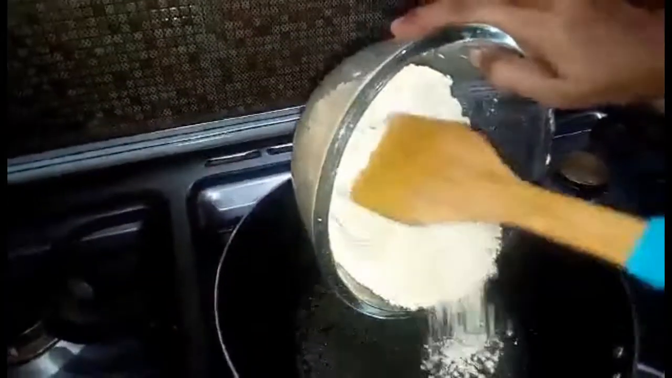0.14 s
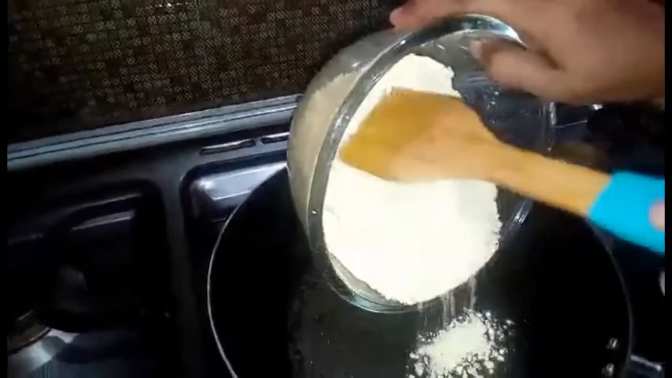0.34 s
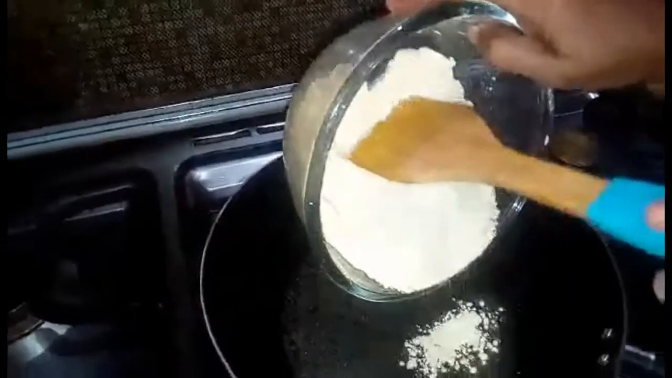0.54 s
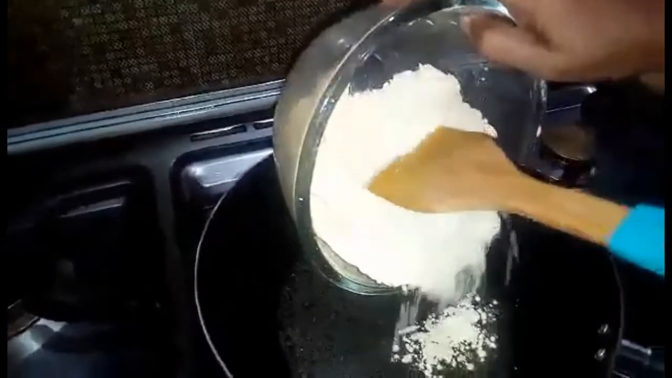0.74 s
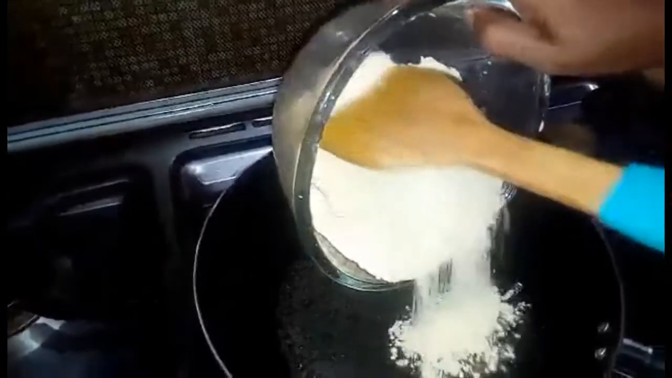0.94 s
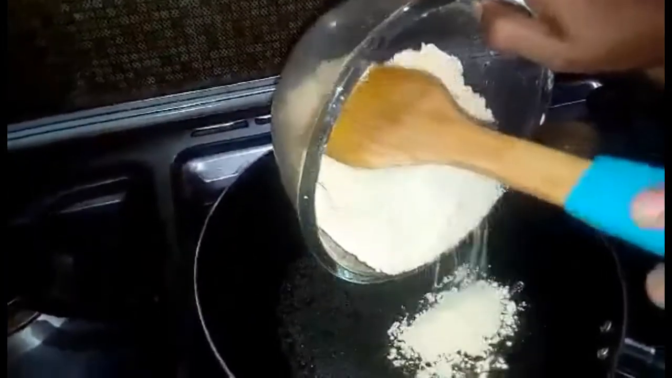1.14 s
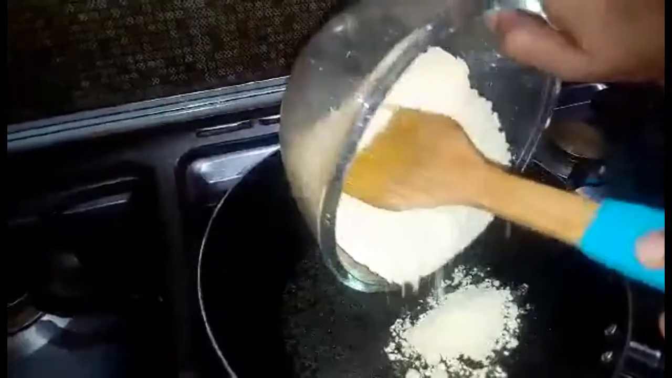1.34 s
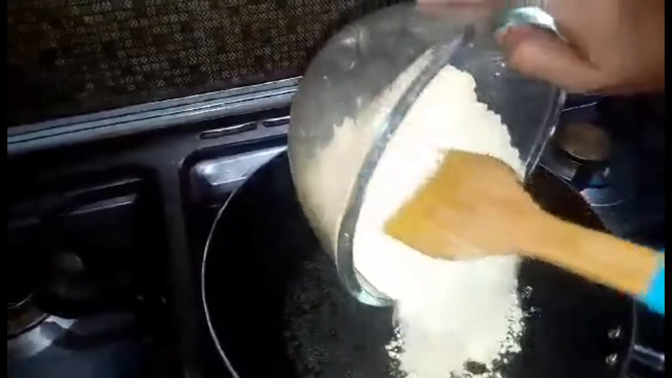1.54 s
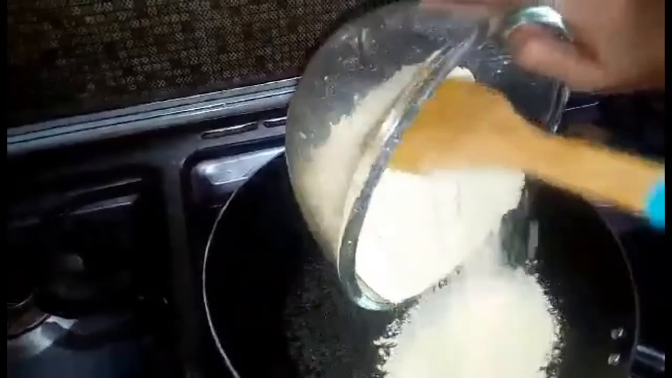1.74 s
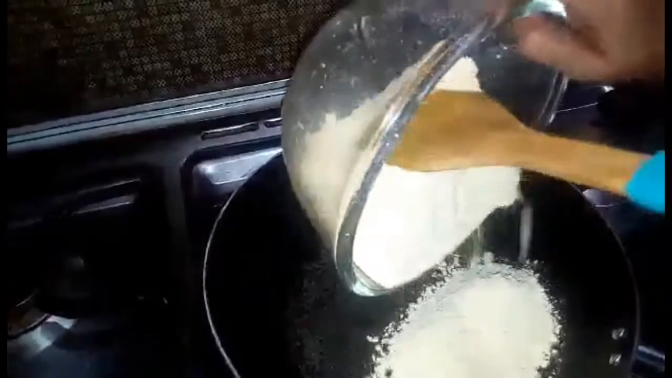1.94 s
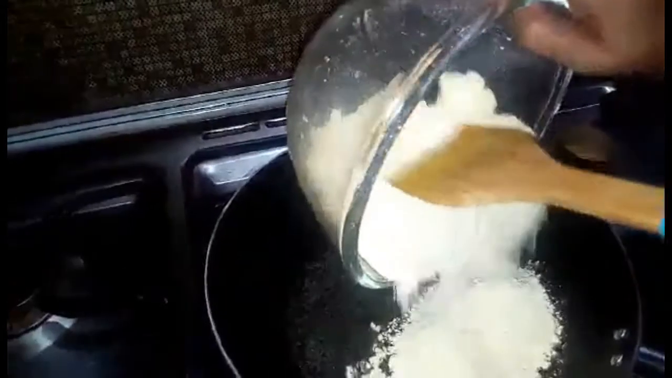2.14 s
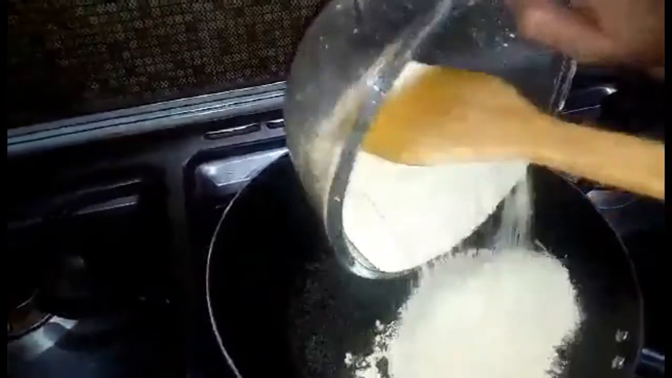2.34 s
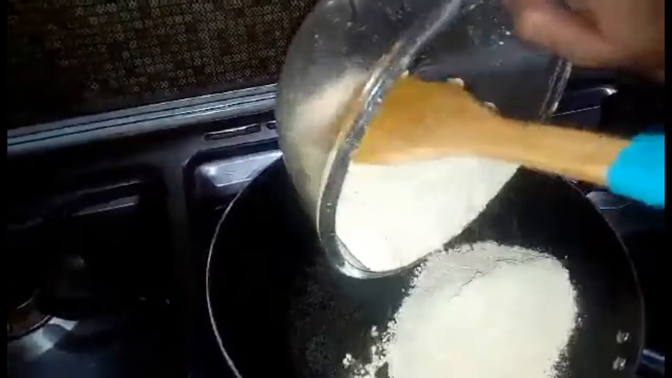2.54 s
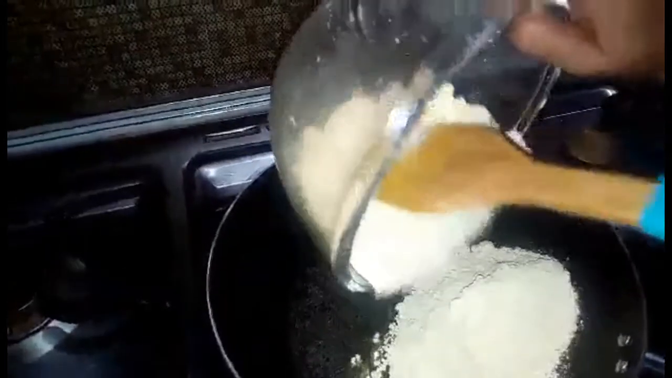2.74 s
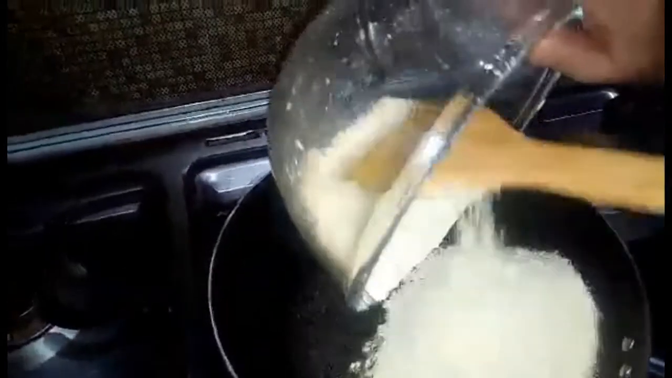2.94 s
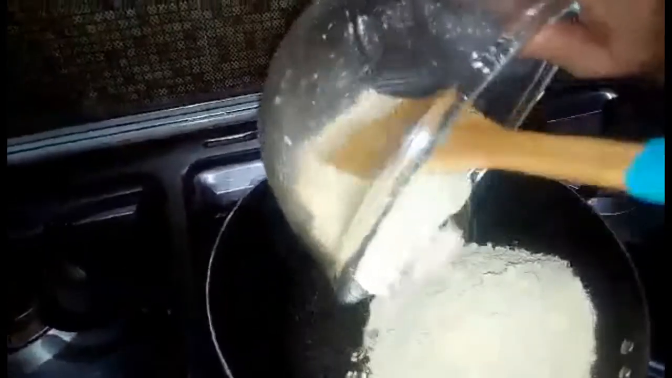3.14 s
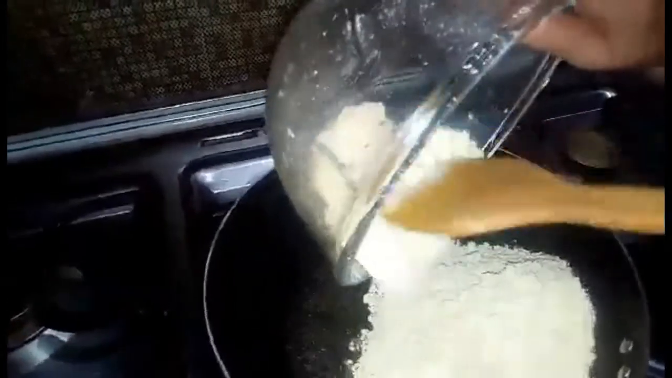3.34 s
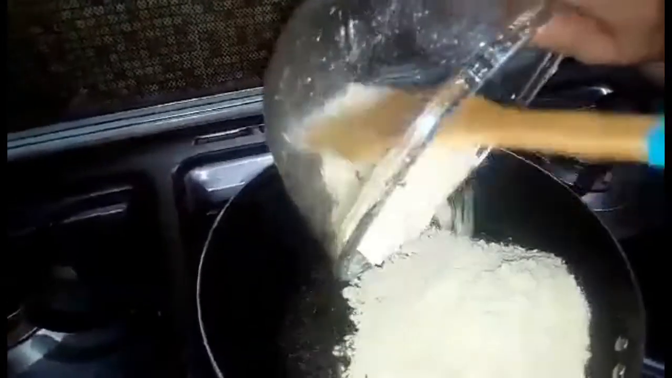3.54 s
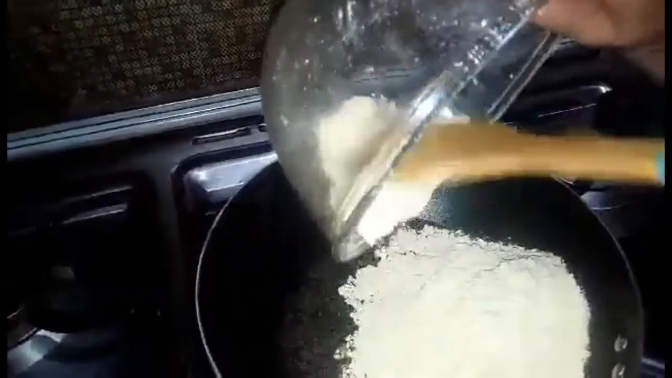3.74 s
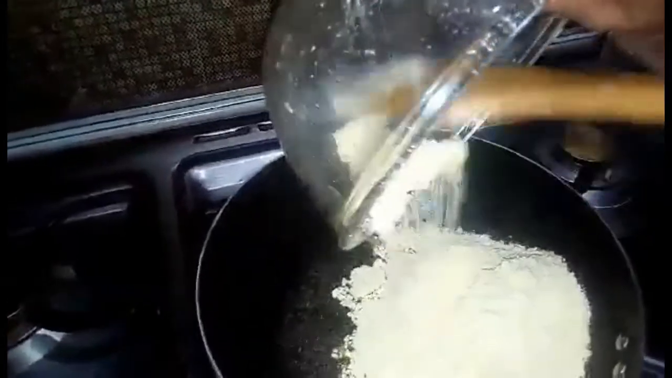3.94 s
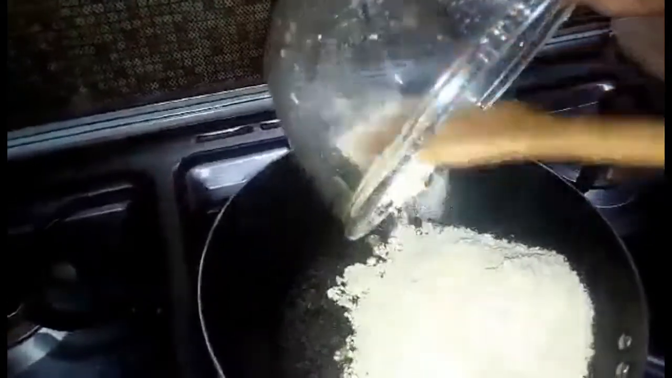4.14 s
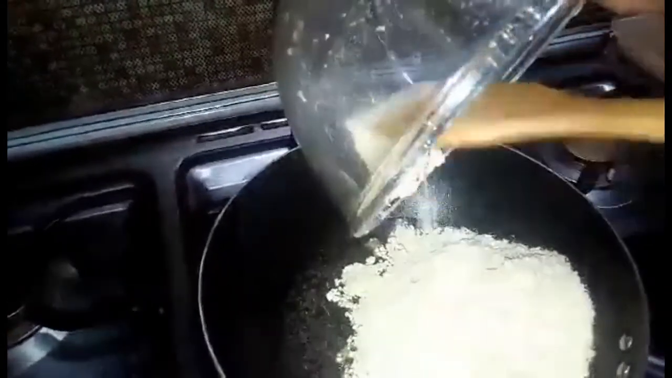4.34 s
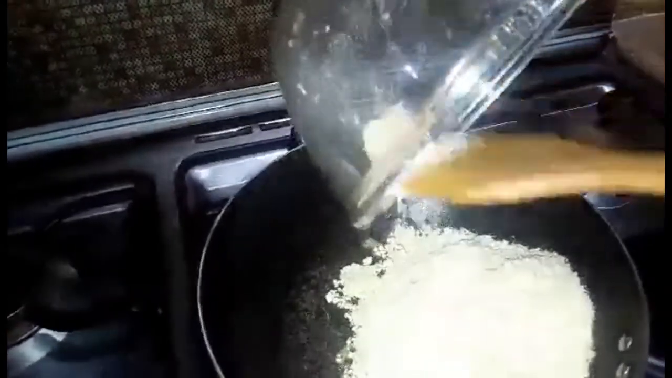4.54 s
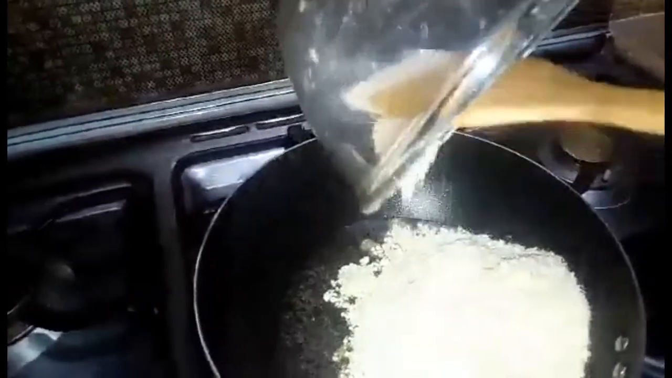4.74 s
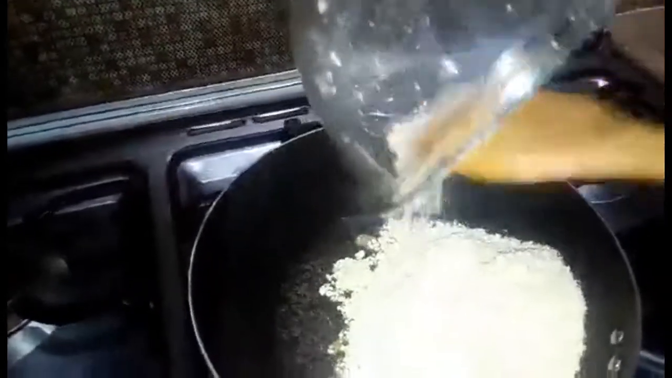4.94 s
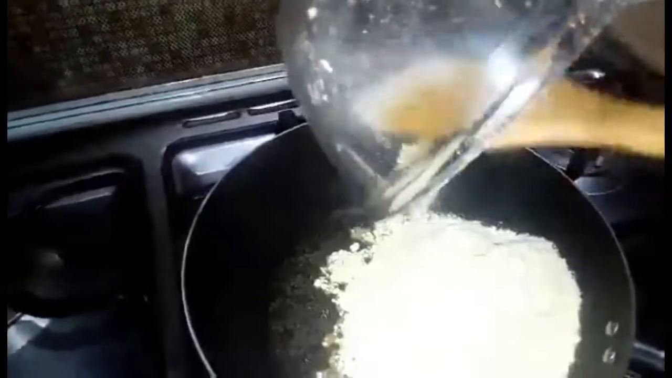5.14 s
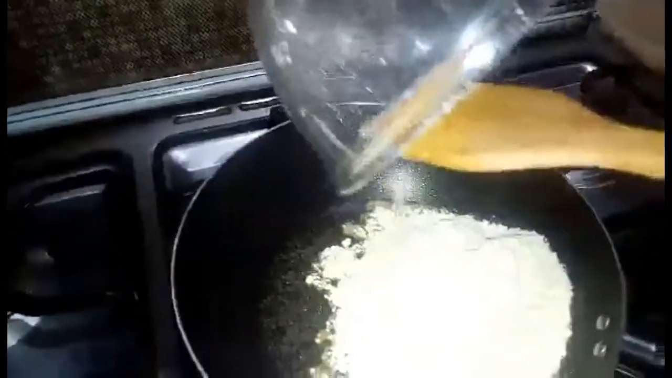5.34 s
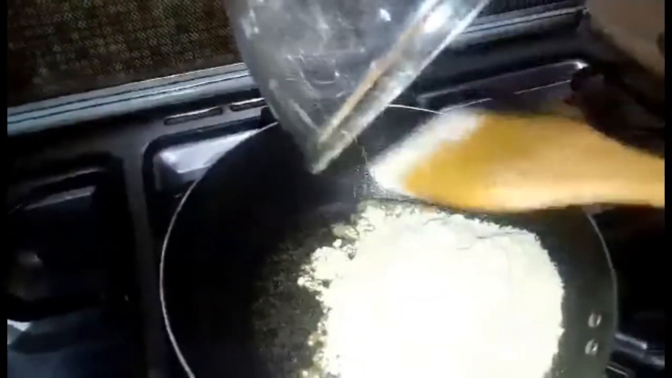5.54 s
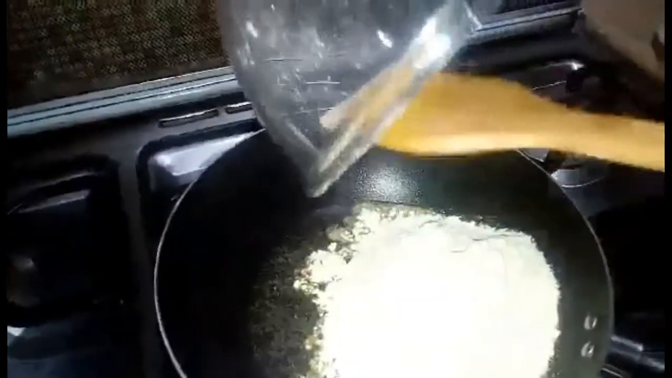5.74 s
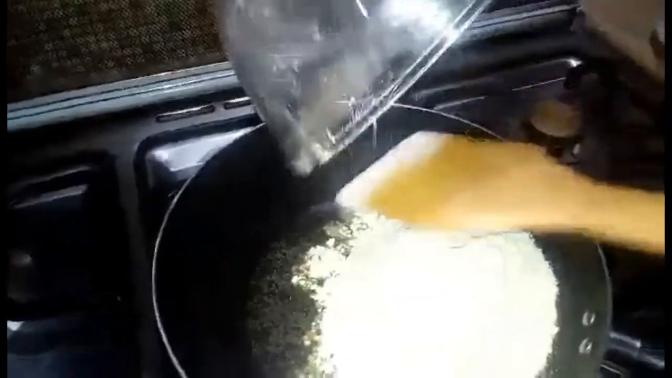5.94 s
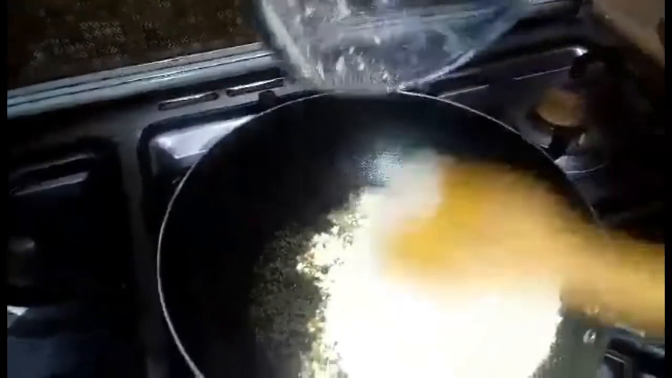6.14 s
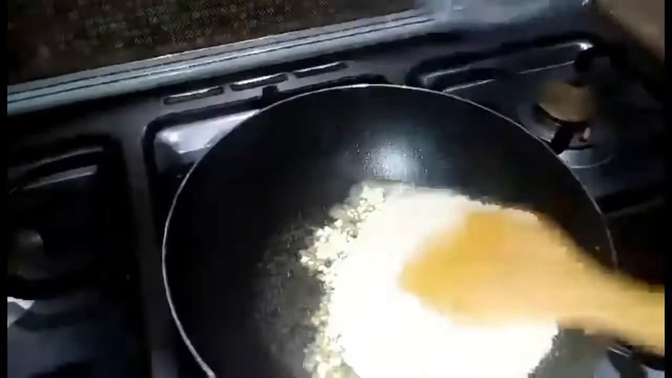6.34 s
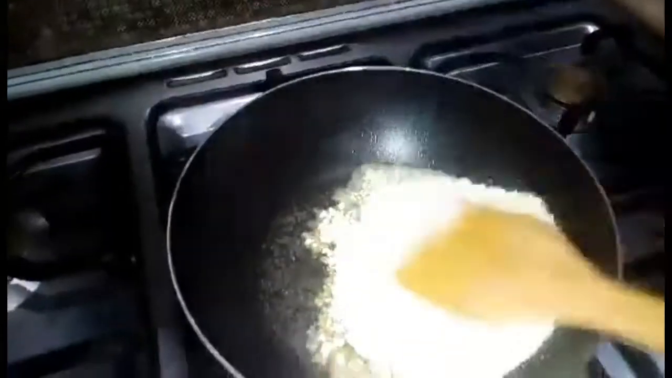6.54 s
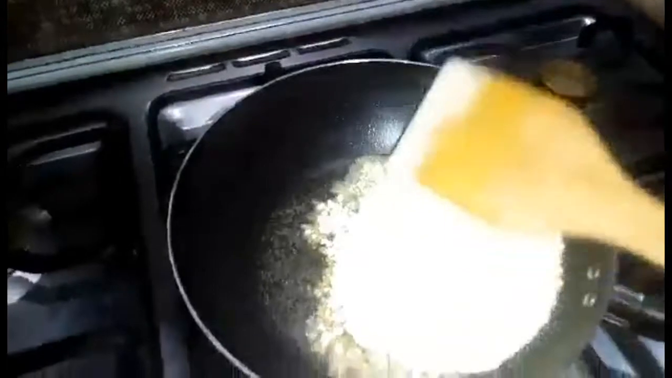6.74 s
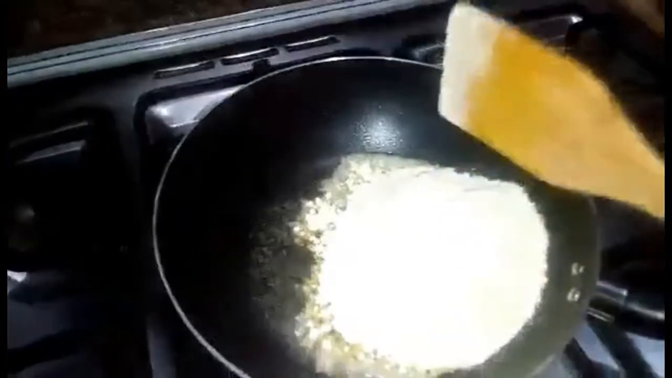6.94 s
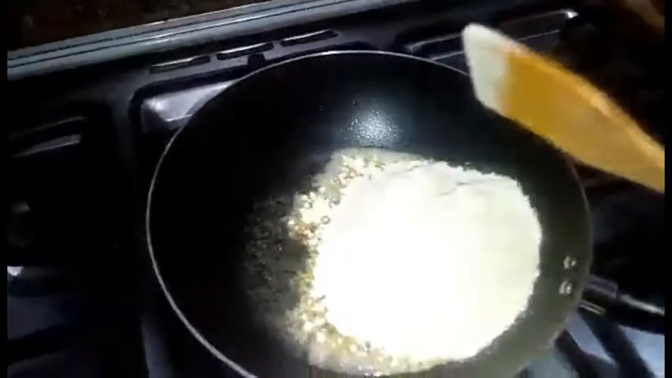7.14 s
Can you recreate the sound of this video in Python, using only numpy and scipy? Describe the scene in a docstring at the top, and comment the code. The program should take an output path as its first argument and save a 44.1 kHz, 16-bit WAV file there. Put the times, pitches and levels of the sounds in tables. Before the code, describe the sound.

Close to the microphone in a small kitchen, a wooden spatula pushes flour from a glass bowl. After a quiet second of gas hiss and motor hum come sparse knocks, some hard, some muffled by flour, with grainy swishes between. Later knocks are brighter and more glassy, each with a faint ring and short room tail. The last hard clack comes near six seconds, then only burner, hum and tiny pan ticks remain.

```python
"""A gas burner hisses and a motor hums, as filtered noise and drifting sine tones; a hot pan ticks faintly.
A wooden spatula pushes flour out of a hand-held glass bowl into the pan, close to the microphone.
Between knocks it swishes: noise in a narrow, grainy band. Each knock is a short blow sent through resonances:
dull while flour cushions the blade, bright once the glass is bare.
The glass rings faintly after each knock, and the small kitchen answers with a short tail of noise."""
import sys
import numpy as np
from scipy import signal
from scipy.fft import rfft, irfft, next_fast_len
from scipy.io import wavfile
from scipy.ndimage import uniform_filter1d, minimum_filter1d, map_coordinates

SR = 44100
rng = np.random.default_rng(int(sys.argv[2]) if len(sys.argv) > 2 else 0)


def persist_wave(psi):
    """Save psi, clipped to +-1, as 16-bit WAV."""
    counts = np.round(np.clip(psi, -1, 1) * 32767).astype(np.int16)
    wavfile.write(sys.argv[1], SR, np.atleast_2d(counts).T)


N = 321048


def amp(db):
    """Turn decibels into a gain."""
    return 10 ** (np.asarray(db) / 20)


def unit(x):
    """Scale a sound to rms 1."""
    return x / np.sqrt(np.mean(x ** 2) + 1e-20)


def along(points, hz):
    """Read a curve of (f/Hz, value) points, with frequency on a log axis."""
    f, value = np.transpose(points)
    return np.interp(np.log(hz + 1), np.log(f + 1), value)


def wobble(rate):
    """A smooth random curve through `rate` random points a second."""
    points = rng.standard_normal(int(N * rate / SR) + 4)
    return map_coordinates(points, [np.arange(N) * rate / SR])


def filtered(x, response):
    """Shape a sound by a response that depends on frequency."""
    size = next_fast_len(len(x) + SR // 4)
    hz = np.fft.rfftfreq(size, 1 / SR)
    return irfft(rfft(x, size) * response(hz), size)[:len(x)]


def noise(spectrum):
    """Random noise coloured by a spectrum, at rms 1."""
    return unit(filtered(rng.standard_normal(N), lambda hz: amp(along(spectrum, hz))))


def causal(gain):
    """The minimum-phase response with this gain: it acts as early as it can."""
    cepstrum = irfft(np.log(gain))
    half = len(cepstrum) // 2
    return np.exp(rfft(np.r_[cepstrum[0], 2 * cepstrum[1:half], np.zeros(half)]))


def add(track, start_s, sound):
    """Mix a sound into the track from start_s on."""
    part = track[max(round(start_s * SR), 0):][:len(sound)]
    part += sound[:len(part)]


# How loud the background is over time, before trims: t/s, burner level/dB, room noise level/dB
STEADY_LEVELS = [(0.0, -46.5, -54), (1.52, -48, -54), (2.66, -49, -54), (2.9, -48, -55), (3.26, -44.5, -54),
                 (3.55, -45, -53), (4.24, -52.5, -56.5), (4.85, -50, -57.5), (5.09, -46.5, -56),
                 (5.52, -49, -56), (5.88, -47.5, -55), (6.1, -49, -58.5), (6.93, -48.5, -57),
                 (7.28, -52, -56.5)]
BURNER_TRIM_DB, ROOM_TRIM_DB = -0.75, 0.08


def steady_levels():
    """The burner and room levels glide in straight lines (in dB) between the table's points."""
    times, *columns = np.transpose(STEADY_LEVELS)
    return [np.interp(np.arange(N) / SR, times, column) for column in columns]


# Colour of the room noise: f/Hz, relative level/dB (per Hz)
ROOM_COLOUR = [(20, -23), (45, -9.5), (75, -5.5), (125, 2), (175, -3.5), (280, 3), (340, -2), (600, -1),
               (1200, -6.5), (1400, -5.5), (1560, 1), (1800, -4.5), (3000, -10.5), (6000, -30)]
# Tones of the motor, before they swell with the room: f/Hz, rms level/dB
HUM_TONES = [(101, -55), (206, -69), (287, -71), (308, -72.5), (400, -72)]


def hum_tone(hz, drift_hz=1.32):
    """One motor tone whose pitch and level both waver slightly, at rms about 1."""
    level = amp(.6 * wobble(9))
    turns = np.cumsum(hz + drift_hz * wobble(9)) / SR
    return level * np.sqrt(2) * np.sin(2 * np.pi * turns)


def room_and_motor(room_db):
    """Soft room noise with a motor humming in it."""
    hum = sum(amp(db) * hum_tone(hz) for hz, db in HUM_TONES)
    # the hum swells and sinks with the rest of the room noise
    swell = amp(room_db - room_db.mean())
    return amp(room_db + ROOM_TRIM_DB) * noise(ROOM_COLOUR) + swell * hum


# Resonant band of the burner's throat: f/Hz, relative level/dB (per Hz)
BURNER_COLOUR = [(1200, -66), (1900, -14.5), (2100, -2), (2220, 9.5), (2370, 5), (2480, 3), (2680, -5.5),
                 (2900, -31), (4000, -52)]
# Higher, steadier hiss of the burner: f/Hz, relative level/dB (per Hz)
HISS_COLOUR = [(1500, -29), (3000, -10), (3800, -6.5), (4200, -3), (4750, -1), (5050, 6), (5300, 0.5),
               (6300, -2), (7100, -9.5), (8500, -15.5), (10500, -14.5), (13000, -15)]


def gas_burner(burner_db, hiss_db=-60.0):
    """Gas rushes through the burner's resonant throat; both noise bands flutter at random."""
    throat = amp(burner_db + BURNER_TRIM_DB + 1.7 * wobble(7.22)) * noise(BURNER_COLOUR)
    hiss = amp(hiss_db + 1.5 * wobble(19.0)) * noise(HISS_COLOUR)
    return throat + hiss


def background():
    """The burner and the humming room together."""
    burner_db, room_db = steady_levels()
    return gas_burner(burner_db) + room_and_motor(room_db)


# The clearest tiny bursts in the hot pan: t/s, starting level/dB before colouring
CLEAR_TICKS = [(2.304, -46), (4.933, -48), (5.402, -43), (5.428, -43), (6.573, -44), (6.624, -47),
               (7.0, -42)]
# Colour of every tick: f/Hz, gain level/dB
TICK_TONE = [(2000, -20), (5000, 4), (8000, -3.5), (11500, -1.5), (14000, -7)]


def pan_ticks(t60=0.011, faint_db=-60, spread_db=6, count=32):
    """A few clear ticks among many faint ones, which come ever faster as the pan fills; each is fading noise."""
    out, t = np.zeros(N), np.arange(SR // 20) / SR
    # the square root crowds the faint ticks towards the end
    faint = [(np.sqrt(when) * N / SR, faint_db + spread_db * size) for when, size in rng.random((count, 2))]
    for start_s, db in CLEAR_TICKS + faint:
        fade = amp(db - 60 * t / t60)
        add(out, start_s, fade * rng.standard_normal(len(t)))
    return filtered(out, lambda hz: amp(along(TICK_TONE, hz)))


# Blade sliding through flour on glass, before the grain:
# middle t/s, half length t/s (to 1/e of the peak), peak level/dB, centre f/Hz
SLIDES = [(0.778, 0.061, -61, 5000), (1.216, 0.078, -61, 6140), (1.89, 0.061, -52.5, 5830),
          (2.547, 0.051, -51.5, 4500), (2.583, .06, -52, 6100), (3.116, 0.046, -52.5, 6000),
          (3.311, 0.056, -53.5, 5700), (3.513, 0.76, -65, 4200), (4.34, 0.036, -58.5, 5700),
          (4.639, 0.38, -63, 5400), (6.313, 0.036, -61, 4200)]


def swishes(width=0.097, grain_db=2.3):
    """Powder shears under the blade in a narrow, grainy hiss that swells and fades; width is a share of centre."""
    out, t = np.zeros(N), np.arange(N) / SR
    for middle_s, half_s, db, centre_hz in SLIDES:
        stroke = t[abs(t - middle_s) < .4]
        band = lambda hz: 1 / (1 + ((hz / centre_hz - 1) / width) ** 2)
        rub = unit(filtered(rng.standard_normal(SR), band))[:len(stroke)]
        swell = np.exp(-((stroke - middle_s) / half_s) ** 2)
        add(out, stroke[0], amp(db) * rub * swell)
    return out * amp(grain_db * wobble(140))


# How long the kitchen rings: f/Hz, time to fall by 60 dB t/s
KITCHEN_DECAY = [(200, 0.26), (600, 0.32), (1400, 0.44), (3500, 0.39), (6000, 0.47), (11000, 0.27)]
# How strongly the walls reflect, before the overall room level: f/Hz, level/dB
WALL_COLOUR = [(150, 15.5), (400, 6), (650, 8.5), (1200, -7.5), (2400, -1), (3200, -4.5), (5500, -1.5),
               (10000, -5.5)]


def kitchen(x, build_up_s=0.0012):
    """The diffuse answer of the room: a noise tail in which each frequency dies at its own speed."""
    hz, t, cells = signal.stft(rng.standard_normal(SR // 2), SR, nperseg=256)
    fade = amp(-60 * t / along(KITCHEN_DECAY, hz)[:, None])
    tail = signal.istft(cells * fade, SR, nperseg=256)[1]
    tail = tail * (1 - np.exp(-(np.arange(len(tail)) / SR / build_up_s) ** 2))
    tail = filtered(tail / np.linalg.norm(tail), lambda f: amp(along(WALL_COLOUR, f)))
    return signal.fftconvolve(x, tail)[:len(x)]


CUSHION_HZ = 1296  # flour moves the blow's energy from above this to below it
PUSH_HZ, PUSH_CONTACT_S = 466, 0.00024  # the push on the whole bowl lies below this; neutral contact time
PUSH_DB, FLOUR_PUSH = 7, 0.14  # push in dB per doubling of the contact time, and per dB of cushion


def blow_spectrum(hz, strength_db, contact_s, fall, cushion_db, crisp_db=-66):
    """A longer contact loses treble and pushes harder; flour under the blade turns a clack into a thud."""
    below = lambda corner: 1 / (1 + (hz / corner) ** 4)
    softness = 1 / np.hypot(1, amp(fall * np.log2(hz * contact_s + 1e-9)))
    tilt_db = cushion_db * (below(CUSHION_HZ) - .5)
    push_db = PUSH_DB * np.log2(contact_s / PUSH_CONTACT_S) + FLOUR_PUSH * cushion_db
    # a small crisp part keeps some treble in every blow
    return amp(strength_db + tilt_db + push_db * below(PUSH_HZ)) * (softness + amp(crisp_db))


OVERTONE, OVERTONE_DB = 2.38, -4  # second bending mode of the pressed blade, over its first


def contact_gain(hz, contact_hz, contact_db, width_hz=40.5):
    """The blade pressed on the glass has two bending modes of its own, different at each spot."""
    peak = lambda centre, db: amp(db) ** 2 / (1 + ((hz - centre) / width_hz) ** 2)
    first = peak(contact_hz, contact_db)
    second = peak(OVERTONE * contact_hz, contact_db + OVERTONE_DB)
    return np.sqrt(1 + first + second)


# Quickly damped resonances of blade and held bowl: f/Hz, width f/Hz, relative level/dB
BODY_MODES = [(342, 111, -15), (591, 77, 1), (874, 84, 2.5), (1176, 133, -2), (1539, 123, 1),
              (1910, 213, -5), (2333, 125, 2.5), (3010, 320, -1.5), (3210, 1200, -7.5), (4920, 166, 3.5),
              (4944, 120, 2.5), (6070, 820, 3.5), (7520, 1030, 0), (8780, 2200, -0.5), (11600, 2600, 4.5)]


def body_response(hz, thud_hz=70., thud_db=-35.0):
    """Blade and bowl resonate briefly, and the whole bowl gives a little in the hand."""
    body = amp(thud_db) / (1 + 1j * hz / thud_hz)
    for k, (centre, width, db) in enumerate(BODY_MODES):
        resonance = 1j * hz * width / (centre ** 2 - hz ** 2 + 1j * hz * width)
        body = body + (-1) ** k * amp(db) * resonance  # neighbours take opposite signs
    return body


COPY_SHARE = 0.8  # gain of the delayed copy of each knock


def copy_and_scatter(hz, t, copy_delay_s):
    """One delayed copy gives each knock its own comb-like colour; the hollow of the bowl scatters the knock."""
    scatter = rng.standard_normal(len(t)) * amp(-60 * t / .025)
    scatter = amp(-13) * scatter / np.linalg.norm(scatter)
    return 1 + COPY_SHARE * np.exp(-2j * np.pi * hz * copy_delay_s) + rfft(scatter)


# Lasting modes of the glass, before strength and damping: f/Hz, level/dB, time to fall by 60 dB t/s
GLASS_MODES = [(598, -65, .45), (716, -66, .28), (846, -61, .34), (1560, -71, .45), (1647, -72, .33),
               (2410, -66, .27), (2968, -66, .36), (3729, -69, .22), (4109, -73, .46), (4777, -69, .35),
               (6374, -78, .4), (9003, -66, .22)]
RING_DB, FLOUR_DAMPING = 0.5, 0.14  # ring of the glass; dB lost per dB of cushion
MAIN_WANDER = 0.81  # size in radians of the waver that the pressing blade gives the strongest ring


def glass_mode(t, hz, db, t60, phase=0):
    """One ringing mode: a sine that fades by 60 dB in t60 seconds."""
    return amp(db - 60 * t / t60) * np.sin(2 * np.pi * hz * t + phase)


def glass_ring(t, blow, cushion_db, main_hz, main_db):
    """The blow leaves a faint ring that flour damps; one mode, set by where the blade lands, rings most."""
    ring_db = RING_DB - FLOUR_DAMPING * cushion_db
    modes = sum(glass_mode(t, hz, db + ring_db + rng.standard_normal(), t60) for hz, db, t60 in GLASS_MODES)
    ring = irfft(blow * rfft(modes))
    hz, _, t60 = min(GLASS_MODES, key=lambda row: abs(row[0] - main_hz))
    ring = ring + glass_mode(t, hz, main_db, t60, MAIN_WANDER * wobble(69.4)[:len(t)])
    # the blade stays on the glass, so the ring is uneven
    uneven = .85 + .4 * map_coordinates(rng.standard_normal(128), [t * 110])
    return ring * uneven


# Spatula on bowl: t/s, strength level/dB, contact time t/s, treble fall level/dB per octave,
# flour cushion (bass over treble) level/dB, contact resonance f/Hz, its level/dB,
# delay of the copy that varies the knock's comb-like colour t/s,
# glass mode that rings most f/Hz, its level/dB
SPATULA_KNOCKS = [ (1.0335, -7, 0.00038, 27, -8, 786, 14.5, 0.00046, 598, -38.5),
                  (1.109, 4.5, 0.0002, 48, 27, 930, 3.5, 0.00035, 598, -74),
                  (1.8333, 22, 0.00032, 35, -3, 1770, 8.5, 0.0013, 846, -28.5),
                  (2.501, 1.5, 0.00033, 48, 21.5, 2770, 13, 0.0011, 716, -42),
                  (2.5202, 6, 0.0002, 40, 27.5, 1710, 16.5, .00208, 598, -32.5),
                  (3.0802, 19.5, .00038, 37, 7.5, 399, 2, 0.00037, 716, -30),
                  (3.59, -15.5, 0.00029, 18, 23.5, 450, 13.5, 0.00084, 716, -42),
                  (3.671, 6, 0.00023, 18, -37, 2660, 4, 0.0014, 4109, -36),
                  (4.0556, 24, 0.0006, 24, -7.5, 1770, 11.5, 0.001063, 4109, -42.5),
                  (4.469, 12.5, 0.00032, 33.5, -13, 540, 9, 0.00099, 598, -51),
                  (4.839, 17, 0.00023, 46, -19, 838, 13.5, .00039, 846, -31.5),
                  (5.1259, 20, .00022, 49.5, -12, 994, 2, 0.0018, 598, -36.5),
                  (5.1535, 10.5, 0.00032, 47, -13.5, 3250, 16, 0.00045, 598, -43.5),
                  (5.7894, 16.5, 0.00023, 36, -13, 778, 11.5, .0004, 846, -26),
                  (5.996, -15.5, 0.00023, 51, -11, 750, 12, 0.0013, 846, -63)]
ROOM_DB = -5.5  # level of the kitchen's answer, before the colour of the walls


def knocks(size=32768):
    """Each blow sounds the damped body, leaves a ring in the glass and is answered by the kitchen."""
    out, t, hz = np.zeros(N), np.arange(size) / SR, np.fft.rfftfreq(size, 1 / SR)
    body = body_response(hz)
    for row in SPATULA_KNOCKS:
        start_s, strength_db, contact_s, fall, cushion_db = row[:5]
        contact_hz, contact_db, copy_delay_s, main_hz, main_db = row[5:]
        blow = causal(blow_spectrum(hz, strength_db, contact_s, fall, cushion_db))
        knock = blow * causal(contact_gain(hz, contact_hz, contact_db)) * body
        near = irfft(knock * copy_and_scatter(hz, t, copy_delay_s))
        far = amp(ROOM_DB) * kitchen(irfft(knock))
        ring = glass_ring(t, blow, cushion_db, main_hz, main_db)
        add(out, start_s, near + far + ring)
    return out


def scene():
    """Everything together at one microphone."""
    return (background() + pan_ticks() + swishes() + knocks())[None]


TOP_HZ = 13050  # nothing is kept from this frequency up


def record(dry):
    """A fast limiter holds the loudest knocks at full scale, then the treble is cut off."""
    needed = 1 / np.maximum(abs(dry[0]), 1)
    # 88 samples are about 2 ms
    gain = uniform_filter1d(minimum_filter1d(needed, size=88), size=88)
    return filtered(dry[0] * gain, lambda hz: hz < TOP_HZ)[None]


dry = scene()
out = record(dry)
persist_wave(out)
```